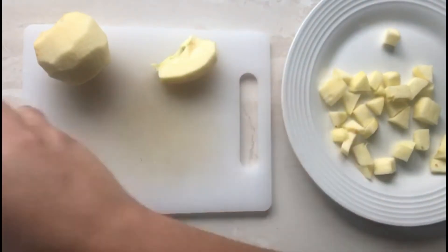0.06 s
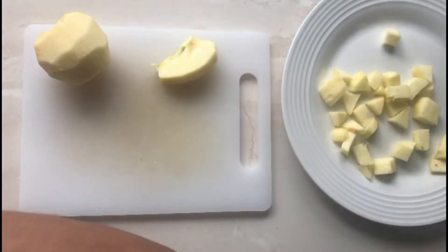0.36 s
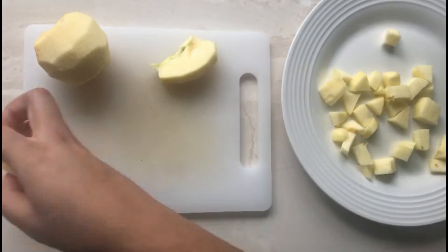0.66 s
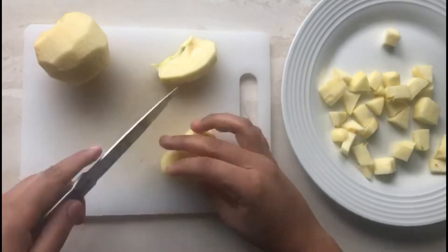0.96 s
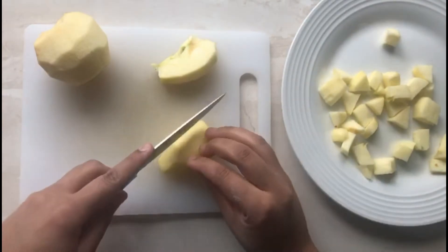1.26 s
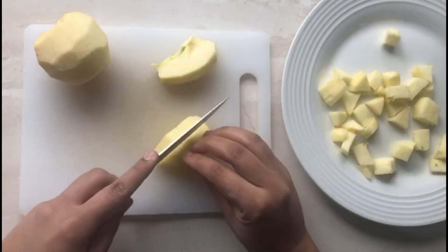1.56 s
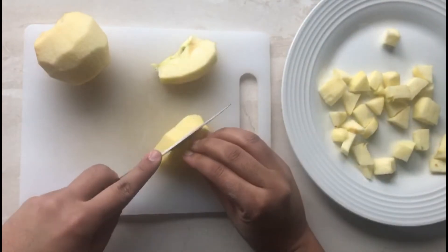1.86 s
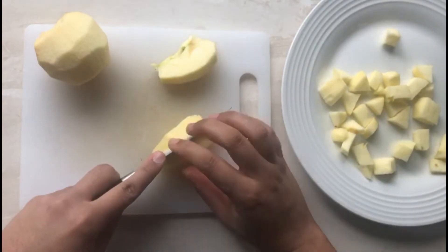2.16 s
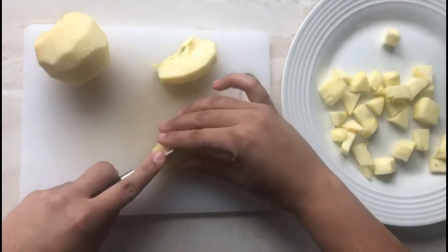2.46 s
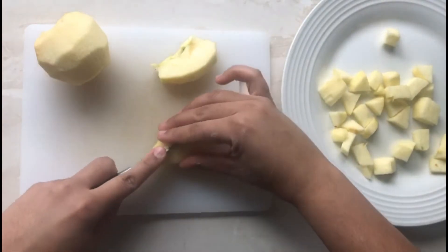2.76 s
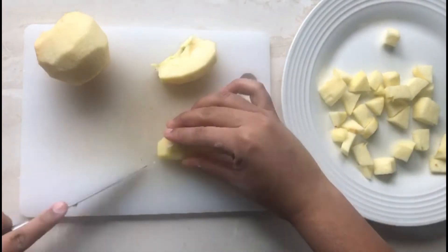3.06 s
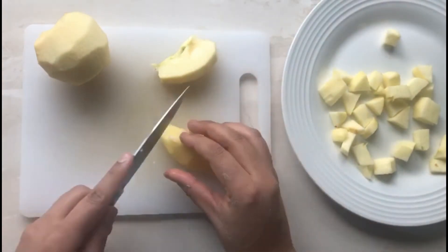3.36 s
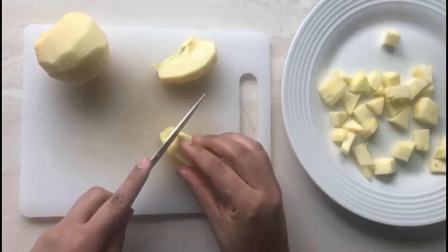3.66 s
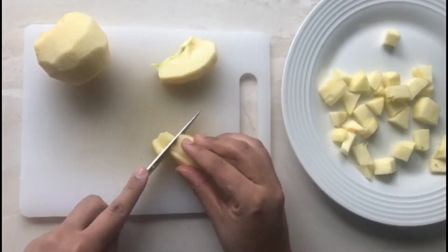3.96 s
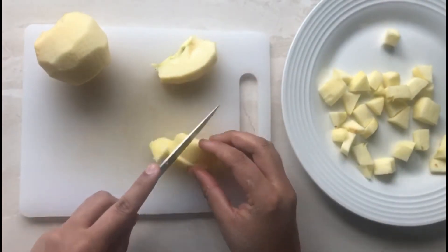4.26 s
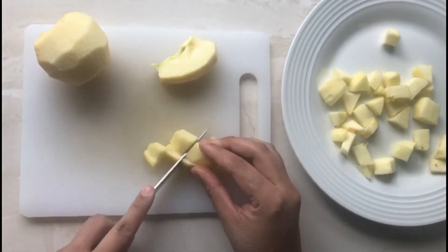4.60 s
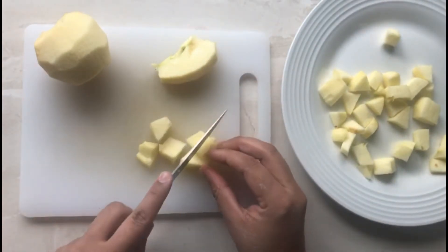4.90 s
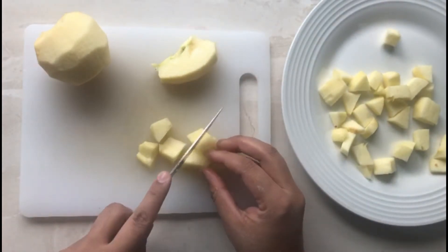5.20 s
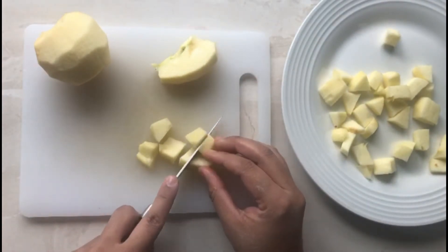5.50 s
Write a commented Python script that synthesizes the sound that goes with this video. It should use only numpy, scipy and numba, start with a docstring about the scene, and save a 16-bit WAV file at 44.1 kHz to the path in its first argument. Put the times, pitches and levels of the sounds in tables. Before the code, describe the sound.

A kitchen knife crunches through peeled apple and knocks on a plastic cutting board four times in a small, quiet kitchen.

```python
"""Soft bumps and the swish of a sleeve, then the crisp crunch of a knife slicing peeled apple on a plastic board.
The flesh crackles in short pushes as its cells burst; four times the blade breaks through, and the impact
excites the modes of the board, a plate and the counter. Friction makes the edge rasp once as it is dragged
back, and the wet blade squeak faintly. The small kitchen reverberates briefly over a low, steady hush."""
import sys
import numpy as np
from scipy import signal
from scipy.fft import rfft, irfft
from scipy.io import wavfile
from scipy.ndimage import uniform_filter1d
from numba import njit

SR = 44100
rng = np.random.default_rng(int(sys.argv[2]) if len(sys.argv) > 2 else 0)


def transcribe(signal):
    """Save signal, clipped to [-1, 1], as a 16-bit WAV file at the path in sys.argv[1]."""
    frames = np.atleast_2d(signal).T
    limited = np.clip(frames, -1, 1)
    pcm = np.round(limited * 32767).astype(np.int16)
    wavfile.write(sys.argv[1], SR, pcm)


N = 253134
T = np.arange(N) / SR
RING = T[:SR]  # one second of time for a single event

# spectrum of the still air: f/Hz, level/dB
AIR_SPECTRUM = [(18, -24.5), (40, 5), (65, 5.5), (145, -4), (350, -5), (500, -12.5), (1200, -16.5),
                (2400, -20.5), (6300, -22.5), (10000, -24.5), (12000, -29)]
# soft bumps as fingers and fruit land and the blade lightly taps the board:
# t/s, bump level/dB, time constant/s, hollow note level/dB, counter level/dB
SOFT_BUMPS = [(0.0, -47.5, 0.076, -58, -74), (0.027, -47, 0.019, -45.5, -74), (.939, -53, 0.027, -75, -52),
              (0.967, -53, 0.037, -68, -67), (1.980, -50, 0.025, -43, -57), (5.034, -55, .018, -66, -77)]
# spectrum of a dull bump: f/Hz, level/dB
BUMP_SPECTRUM = [(50, -8.5), (130, -8), (230, 5.5), (300, -3.5), (390, 0.5), (600, -9), (1200, -16),
                 (2500, -16.5), (5000, -21), (12000, -34.5)]
# the arm goes out and back: t/s, duration/s, level/dB
ARM_MOVES = [(0.182, 0.24, -64), (0.488, 0.42, -66)]
# spectrum of the rubbing sleeve: f/Hz, level/dB
CLOTH_SPECTRUM = [(200, 0), (1500, -0.5), (2600, -4.5), (4000, 0), (6000, -1.5), (9500, 0.5), (12000, -5)]
# short sharp ticks of fibres snapping, a finger's pat, a light touch of the blade: t/s, level/dB
SHARP_TICKS = [(.939, -39), (1.3973, -42), (1.4613, -35), (1.503, -44), (1.549, -43), (1.6555, -33),
               (4.346, -44), (4.8115, -47.5), (5.029, -34), (5.079, -44.5), (5.3137, -36)]
# spectrum of a tick: f/Hz, level/dB
TICK_SPECTRUM = [(100, -17), (400, -10), (900, -13), (1900, -3.5), (2900, -1.5), (4200, 0.5), (6300, -1.5),
                 (9500, -3), (12500, -10.5)]
# pushes through the flesh: t/s, duration/s, level/dB
KNIFE_PUSHES = [(1.24, 0.035, -54.5), (1.395, 0.0038, -51), (1.49, 0.026, -55), (1.551, 0.03, -58),
                (1.694, 0.093, -56), (1.799, .018, -43), (1.865, 0.026, -40.5), (1.97, 0.0274, -34),
                (1.99, 0.061, -52), (2.13, 0.086, -53), (2.322, 0.13, -58.5), (2.466, 0.35, -56),
                (3.555, 0.033, -55.5), (3.619, 0.05, -57), (3.751, 0.11, -50), (3.862, 0.03, -35),
                (4.015, 0.081, -54), (4.366, 0.013, -44), (4.39, 0.036, -44.5), (4.443, 0.045, -36.5),
                (5.07, 0.04, -54.5), (5.319, 0.057, -53), (5.383, 0.027, -38.5), (5.421, 0.029, -36.5),
                (5.491, 0.0084, -37.5)]
# spectrum of bursting cells: f/Hz, level/dB
CELL_SPECTRUM = [(100, -21.5), (400, -9.5), (800, -15.5), (1100, -11.5), (1600, -10.5), (2100, -8.5),
                 (2900, -3), (4200, -0.5), (4900, -4.5), (6300, -1.5), (7900, -7), (9500, -4),
                 (12500, -10.5)]
# two resonances of the blade: t/s, lower f/Hz, lower level/dB, upper level/dB
BLADE_RESONANCES = [(1.3, 3460, 11, -21), (1.898, 3100, 13.5, -13), (2.15, 3460, 2, -5),
                    (2.448, 3920, 9.5, -13), (2.759, 3730, 13, -14), (3.5, 3376, -2, -5.5),
                    (5.3, 3300, 5, 3)]
# modes of the board on the counter: f/Hz, level/dB, T60/s
BOARD_MODES = [(198.7, -28.5, 0.37), (214, -22.5, 0.049), (380, -23.5, 0.035), (408.4, -16.5, .08),
               (428, -22.5, 0.052), (615, -35.5, 0.39), (670, -23, 0.1), (870, -33.5, 0.045),
               (1076, -30, 0.22), (1130, -18, 0.064), (1215, -26, 0.15), (1301, -25.5, 0.1),
               (1476, -26.5, 0.096), (1900, -28, 0.12), (2370, -21.5, 0.078), (2510, -27.5, 0.14),
               (2794, -31, 0.15), (2934, -28.5, 0.11), (3324, -32, 0.16), (3540, -27.5, 0.05),
               (3880, -26, 0.08), (4320, -40.5, 0.094), (5380, -36, 0.073), (6560, -37.5, 0.034)]
# the blade hits the board: t/s, blow level/dB, contact cut-off f/Hz, edge level/dB, edge lead/s,
# plate level/dB, crack level/dB, tear level/dB
IMPACTS = [(2.77, 5, 7166, 0.5, .0026, -56, -19.5, -20), (3.9017, 0.5, 1700, -14, 0.00023, -50, -37, -41),
           (4.4994, 2, 4870, -6.5, 0.00013, -60.5, -9, -36),
           (5.5148, 0, 4130, -4, 0.00013, -44.5, -9, -26.5)]
# spectrum of the board's crowded modes: f/Hz, level/dB
CLACK_SPECTRUM = [(50, -17), (120, -11), (280, -13.5), (450, 1.5), (800, 1), (1400, .5), (1650, -4),
                  (2000, 0), (3300, -7.5), (4300, -5.5), (5100, -10.5), (6500, -8), (9000, -11.5),
                  (12000, -12)]
# the steel edge touches down from tip to heel: delay/s, nominal f/Hz, level/dB, swell time/s
EDGE_CLICKS = [(.0004, 2986, 0.5, .00036), (.0017, 5690, -10, 0.00028), (.0026, 1744, -11, .00044)]
# spectrum of the dragged edge: f/Hz, level/dB
RASP_SPECTRUM = [(100, -20.5), (280, -9.5), (400, 1.5), (600, -5), (1150, -3), (1600, -12.5), (3000, -2.5),
                 (4500, -6), (5700, -6.5), (8000, -12.5), (12000, -19.5)]
# its two rising resonances: start f/Hz, end f/Hz, bandwidth/Hz, level/dB
DRAG_RESONANCES = [(563, 806, 93, 5), (2020, 2350, 130, 9)]
# the wet blade lifts: t/s, duration/s, f/Hz, bandwidth/Hz, level/dB
WET_SQUEAK = (5.13, .17, 2960, 70, -69)
# spectrum of the kitchen's reverberation: f/Hz, level/dB
ROOM_SPECTRUM = [(60, -7), (250, -2.5), (400, -6), (650, 1), (1150, -0.5), (1800, -2.5), (2700, -5.5),
                 (4500, -3.5), (7000, -0.5), (12000, -1)]
# its reverberation time: f/Hz, T60/s
ROOM_DECAY = [(100, .55), (400, .58), (1000, 0.51), (3000, 0.56), (6000, 0.42), (12000, 0.35)]

COUNTER_HZ, COUNTER_SWELL_S = 39.5, 0.073


def undb(db):
    """Amplitude ratio of a level in decibels."""
    return 10 ** (np.asarray(db) / 20)


def unit(x):
    """Normalisation to rms 1."""
    return x / np.sqrt(np.mean(x ** 2))


def on_log(points, hz):
    """Interpolation of (f/Hz, value) points on a logarithmic frequency axis."""
    f, value = np.transpose(points)
    return np.interp(np.log(np.maximum(hz, 1)), np.log(f), value)


def colour(x, spectrum):
    """Spectral shaping by relative levels; white noise keeps its power."""
    hz = np.arange(len(x) // 2 + 1) * SR / len(x)
    return irfft(rfft(x) * unit(undb(on_log(spectrum, hz))), len(x))


def through(x, response):
    """Convolution with an impulse response scaled to unit energy."""
    return signal.fftconvolve(x, response / np.linalg.norm(response))[:len(x)]


def add(out, s, x):
    """Superposition of x on out from time s."""
    i = max(int(s * SR), 0)
    out[i:i + len(x)] += x[:N - i]


def grains(per_s, spread_db):
    """Shot noise: random impulses of very unequal size, rms 1."""
    impulses = (rng.random(N) < per_s / SR) * rng.choice([-1, 1], N)
    return unit(impulses * undb(spread_db * np.minimum(rng.exponential(size=N), 4)))


def wander(per_s):
    """Random fluctuation: straight ramps between Gaussian values, rms 1."""
    step = max(int(SR / per_s), 1)
    held = np.repeat(rng.standard_normal(N // step + 1), step)[:N]
    return unit(uniform_filter1d(held, step))


@njit
def resonate(x, hz, width_hz):
    """Second-order resonance with gain 1 at its centre, which may move."""
    y, band_state, low_state = np.empty(len(x)), 0., 0.
    for i in range(len(x)):
        g, damping = np.tan(np.pi * hz[i] / SR), width_hz / hz[i]
        band = (band_state + g * (x[i] + 1e-18 - low_state)) / (1 + g * (g + damping))
        band_state = 2 * band - band_state
        low_state += 2 * g * band
        y[i] = damping * band
    return y


def fade(t60):
    """Exponential free decay, 60 dB down after t60 seconds."""
    return np.exp(-np.log(1000) * RING / t60)


def burst(hz, swell_s):
    """Tone burst that swells to 1 in swell_s and dies again."""
    u = RING / swell_s
    return (u * np.exp(1 - u)) ** 2 * np.sin(2 * np.pi * hz * RING)


def stroke(s, length):
    """Half-sine velocity of a smooth move: from rest up to 1 and back."""
    return np.sin(np.pi * np.clip((T - s) / length, 0, 1))


def still_air(level_db=-65):
    """Ambient noise: a low hush whose level wavers slightly."""
    return undb(level_db + .6 * wander(2.5)) * colour(rng.standard_normal(N), AIR_SPECTRUM)


def soft_bumps(hollow_hz=397, hollow_swell_s=0.02):
    """Soft impacts excite mainly low modes: a bump, the board's hollow note, a sway of the counter."""
    out = np.zeros(N)
    for s, db, decay_s, hollow_db, counter_db in SOFT_BUMPS:
        bump = undb(db) * colour(rng.standard_normal(SR), BUMP_SPECTRUM) * np.exp(-RING / decay_s)
        hollow = undb(hollow_db) * burst(hollow_hz, hollow_swell_s)
        counter = undb(counter_db) * burst(COUNTER_HZ, COUNTER_SWELL_S)
        add(out, s, bump + hollow + counter)
    return out


def sleeve():
    """Friction noise: cloth hisses in proportion to the speed of the arm."""
    speed = sum(undb(db) * stroke(s, length) for s, length, db in ARM_MOVES)
    return speed * colour(rng.standard_normal(N), CLOTH_SPECTRUM)


def sharp_ticks(decay_s=0.0018, crack_delay_s=.0012):
    """Broadband transients: fibres snap, finger and blade touch, and the flesh cracks at each impact."""
    out = np.zeros(N)
    cracks = [(s + crack_delay_s, crack_db) for s, *_, crack_db, _ in IMPACTS]
    for s, db in [*SHARP_TICKS, *cracks]:
        add(out, s, undb(db) * rng.uniform(-1, 1, SR) * np.exp(-RING / decay_s))
    return colour(out, TICK_SPECTRUM)


def blade_ring(crackle, upper_hz=6150.):
    """Forced vibration: two resonances of the blade colour the crackle."""
    times, *columns = np.transpose(BLADE_RESONANCES)
    lower_hz, lower_db, upper_db = (np.interp(T, times, column) for column in columns)
    lower = undb(lower_db) * resonate(crackle, lower_hz, width_hz=560.)
    upper = undb(upper_db) * resonate(crackle, np.full(N, upper_hz), width_hz=1200.)
    return lower + upper


def push(length, ease_db=0.5, release_s=.009, creep_db=-19, creep_s=0.059):
    """Loading and relaxation: the force of a push bites, eases slightly, lets go and creeps on."""
    bite_s = 0.0011 + .11 * length
    bite = (1 - np.exp(-RING / bite_s)) ** 2
    ease = undb(ease_db * (1 - np.minimum(RING / length, 1)))
    after = np.maximum(RING - length, 0)
    return bite * ease * np.maximum(np.exp(-after / release_s), undb(creep_db) * np.exp(-after / creep_s))


def cutting_forces(load_db=-11, load_db_per_s=4.5, tear_s=.013, tear_rise_db=19, release_s=0.0085):
    """Force on the flesh and load on the board: their coupling grows as the edge goes deeper."""
    force, load = np.zeros((2, N))
    impact_s, *_, tear_db = np.transpose(IMPACTS)
    for s, length, db in KNIFE_PUSHES:
        to_impact_s = min(impact_s[impact_s >= s] - s, default=0)
        add(force, s, undb(db) * push(length))
        add(load, s, undb(db + load_db - load_db_per_s * to_impact_s) * push(length))
    # the last of the flesh tears ever harder up to each impact, then lets go
    rise = undb(tear_rise_db * np.minimum(RING / tear_s - 1, 0))
    release = np.exp(-np.maximum(RING - tear_s, 0) / release_s)
    for s, db in zip(impact_s, tear_db):
        add(force, s - tear_s, undb(db) * rise * release)
    return force, load


def crunch(uneven_db=1.2, direct_db=-4.5, fruit_cutoff_hz=800):
    """Cell rupture: the flesh crackles ahead of the edge, and the fruit passes the lows to the board."""
    force, load = cutting_forces()
    ticks = sharp_ticks()
    cells = grains(per_s=8000, spread_db=3.5) * undb(uneven_db * wander(220))
    crackle = colour(cells * force, CELL_SPECTRUM) + ticks
    muffled_board = signal.lfilter(*signal.butter(1, fruit_cutoff_hz, fs=SR), board())
    return undb(direct_db) * (crackle + blade_ring(crackle)) + through(cells * load, muffled_board)


def board(scatter_db=1.07, detune=.008, travel_at_1khz_s=.0012, radiate_hz=340):
    """Modal response to one blow; bending waves are dispersive, so the lows arrive last."""
    out = np.zeros(SR)
    # hand and fruit load the board a little differently each time
    for (hz, db, t60), (louder, sharper) in zip(BOARD_MODES, rng.standard_normal((len(BOARD_MODES), 2))):
        age = np.maximum(RING - travel_at_1khz_s * np.sqrt(1000 / hz), 0)
        mode = np.sin(2 * np.pi * hz * (1 + detune * sharper) * age)
        out += undb(db + scatter_db * louder) * mode * fade(t60)
    # a small panel radiates little bass
    return signal.lfilter(*signal.butter(3, radiate_hz, "high", fs=SR), out)


def clack(level_db=-16, t60=0.093, rise_s=0.00031):
    """Modal overlap: crowded, quickly damped modes of the plastic merge into noise."""
    modes = colour(rng.standard_normal(SR), CLACK_SPECTRUM)
    return undb(level_db) * modes * fade(t60) * (1 - np.exp(-RING / rise_s))


def knocks(plate_hz=1865, plate_t60=1.2, counter_db=-52.5):
    """Impact excitation: the edge clicks and drives the board; a plate and the counter ring along."""
    out = np.zeros(N)
    plate = np.sin(2 * np.pi * plate_hz * RING) * fade(plate_t60)
    counter = undb(counter_db) * burst(COUNTER_HZ, COUNTER_SWELL_S)
    for s, blow_db, contact_hz, edge_db, lead_s, plate_db, *_ in IMPACTS:
        # fruit under the blade cushions the contact and takes the treble away
        knock = signal.lfilter(*signal.butter(2, contact_hz, fs=SR), board() + clack())
        add(out, s, undb(blow_db) * (knock + counter) + undb(plate_db) * plate)
        pitch_ratio = (contact_hz / 4360) ** 0.22  # a harder contact clicks higher
        for delay_s, hz, db, swell_s in EDGE_CLICKS:
            add(out, s - lead_s + delay_s, undb(edge_db + db) * burst(hz * pitch_ratio, swell_s))
    return out


def edge_drag(start_s=2.94, hold_s=.18, attack_s=0.034, release_s=0.021, level_db=-49.5, rise_db=2.5):
    """Stick-slip friction on scored plastic; resonances rise as the contact slides toward the tip."""
    age = T - start_s
    travel = np.clip(age / hold_s, 0, 1)
    grip = np.clip(np.minimum(age / attack_s, 1 - (age - hold_s) / release_s), 0, 1)
    catches = colour(grains(per_s=2500, spread_db=2), RASP_SPECTRUM)
    chatter_db = 0.5 * wander(180)
    rasp = catches * grip * undb(level_db + rise_db * travel + chatter_db)
    return rasp + sum(undb(db) * resonate(rasp, start_hz + (end_hz - start_hz) * travel, float(width_hz))
                      for start_hz, end_hz, width_hz, db in DRAG_RESONANCES)


def blade_squeak():
    """Frictional excitation: wet fruit rubs the rising blade and keeps one of its modes wavering."""
    s, length, hz, width_hz, db = WET_SQUEAK
    mode = resonate(rng.standard_normal(N), np.full(N, float(hz)), float(width_hz))
    return undb(db) * stroke(s, length) * unit(mode)


def near_echoes(x, echo_db=-5, t60=0.018):
    """Interference: early reflections from hands, plate and counter ripple the spectrum."""
    echoes = through(x, rng.standard_normal(SR) * fade(t60))
    return (x + undb(echo_db) * echoes) / np.hypot(1, undb(echo_db))


def kitchen(x, wet_db=-11, build_s=0.0022):
    """Reverberation: between hard walls a diffuse field builds quickly and loses its treble first."""
    hz = np.arange(SR // 2 + 1)
    spectrum = rfft(colour(rng.standard_normal(SR), ROOM_SPECTRUM))
    centres, t60s = np.transpose(ROOM_DECAY)
    tail = np.zeros(SR)
    for weights, t60 in zip(np.eye(len(t60s)), t60s):
        band = irfft(spectrum * on_log(np.c_[centres, weights], hz), SR)
        tail += band * fade(t60)
    build = 1 - np.exp(-(RING / build_s) ** 2)
    return x + undb(wet_db) * through(x, tail * build)


def scene():
    """Superposition of knife, fruit and board in the room with squeak, sleeve and air, in mono."""
    air = still_air()
    board_sounds = knocks() + near_echoes(crunch() + edge_drag()) + soft_bumps()
    return (kitchen(board_sounds) + blade_squeak() + sleeve() + air)[None]


def record(dry, ceiling=.76, top_hz=11900):
    """Soft saturation rounds the loudest peaks; a steep low-pass removes the highest treble."""
    rounded = dry / (1 + (dry / ceiling) ** 6) ** (1 / 6)
    return signal.sosfilt(signal.ellip(8, .2, 70, top_hz, fs=SR, output="sos"), rounded)


dry = scene()
out = record(dry)
transcribe(out)
```